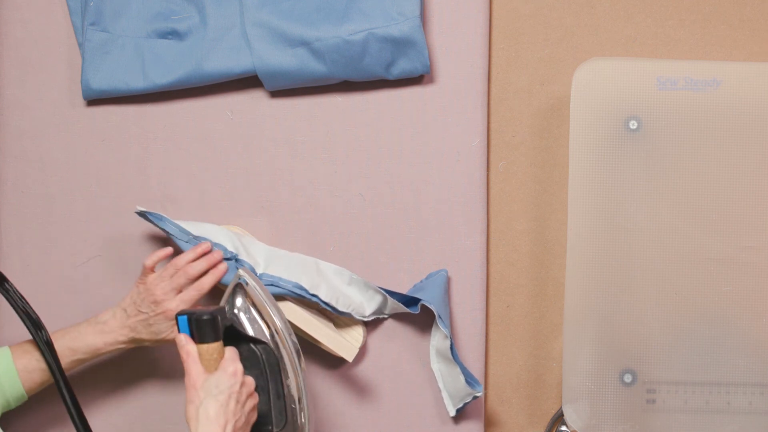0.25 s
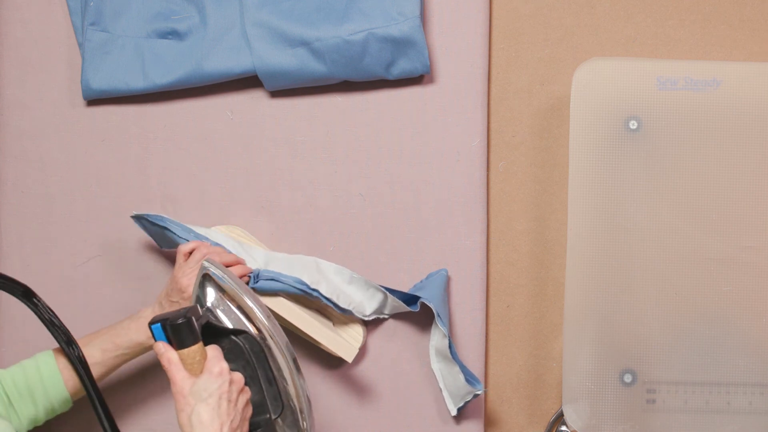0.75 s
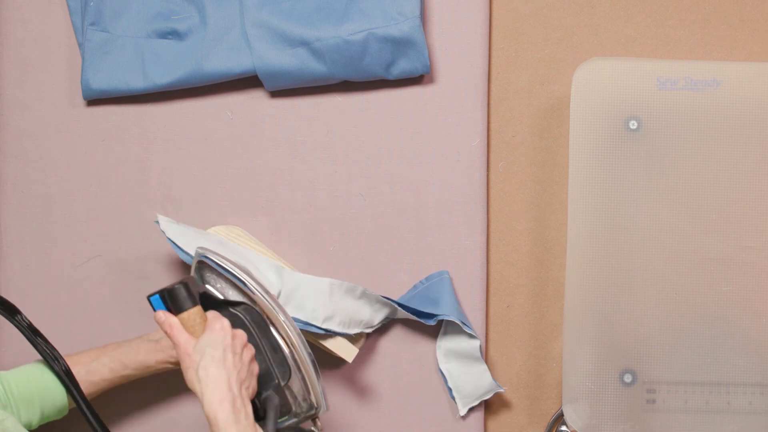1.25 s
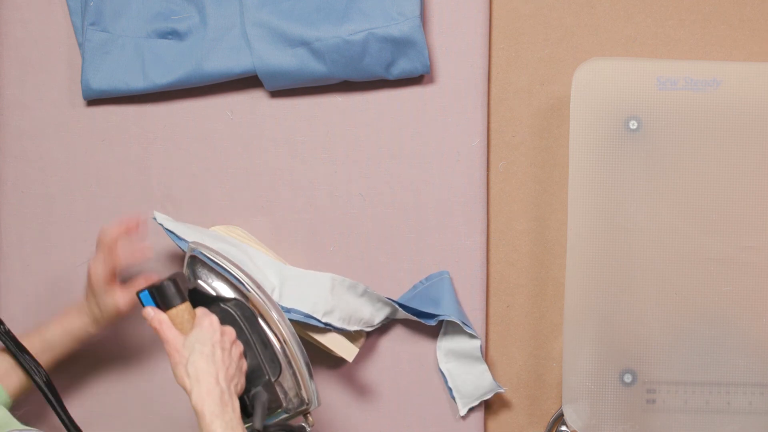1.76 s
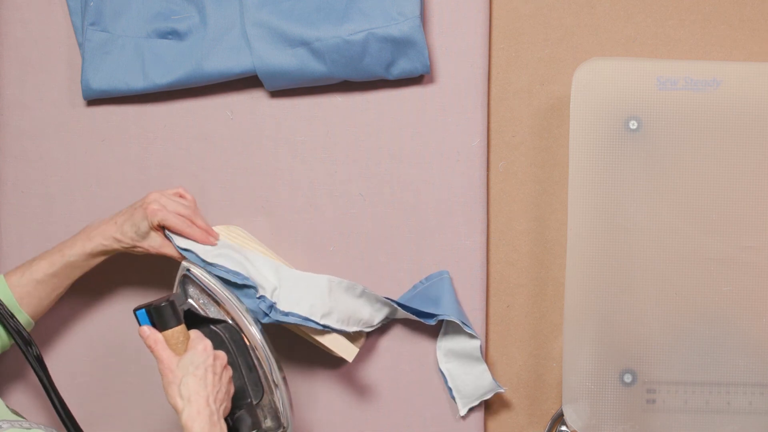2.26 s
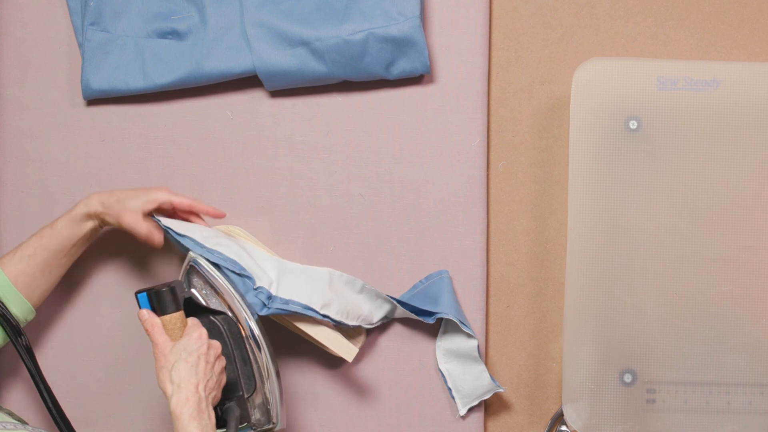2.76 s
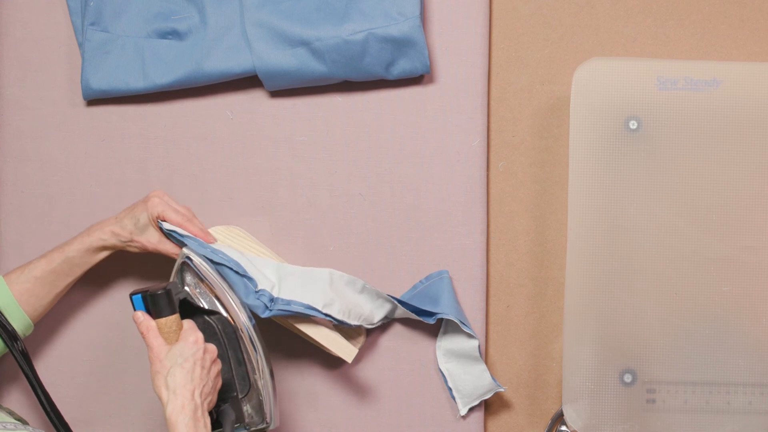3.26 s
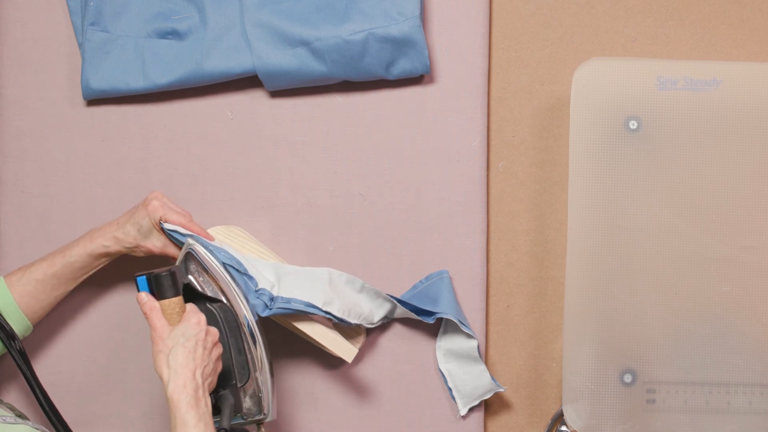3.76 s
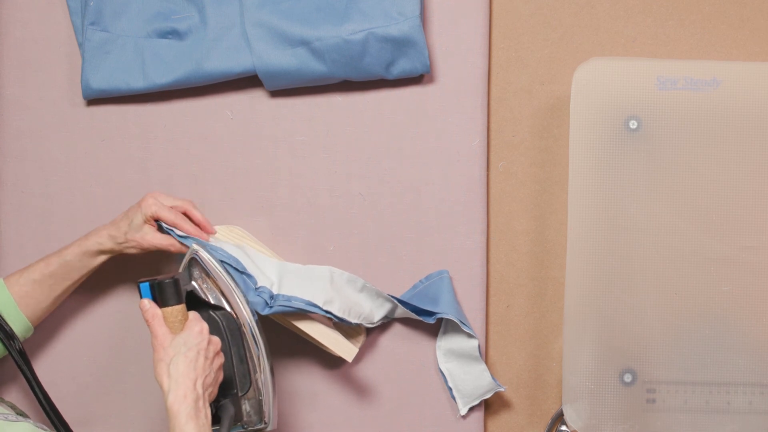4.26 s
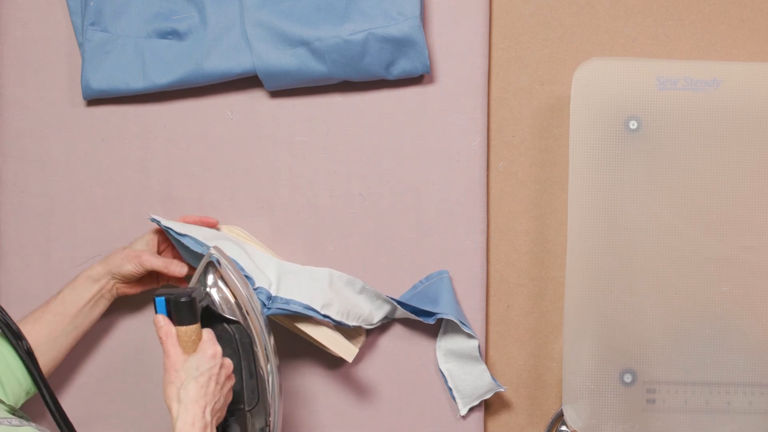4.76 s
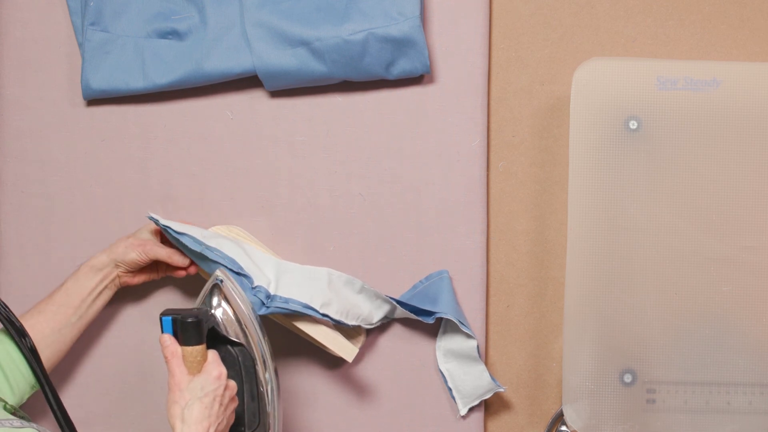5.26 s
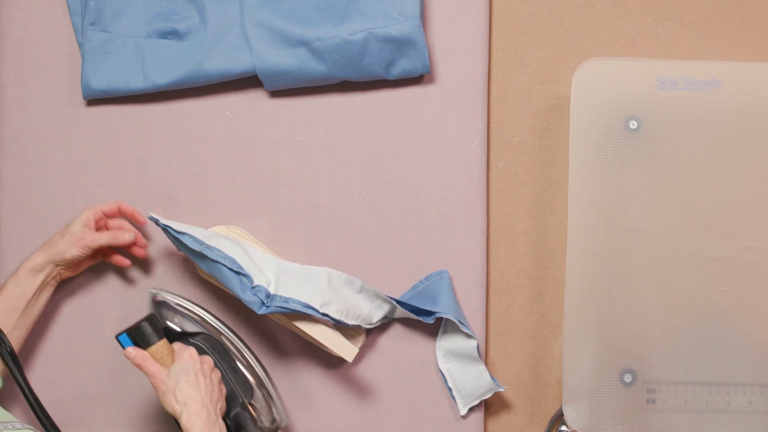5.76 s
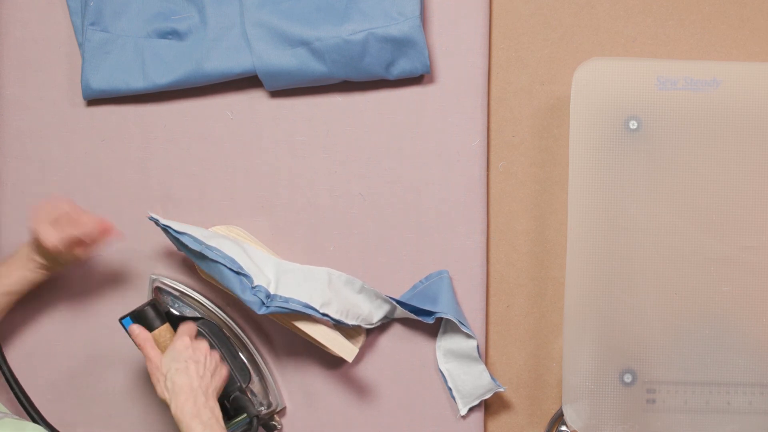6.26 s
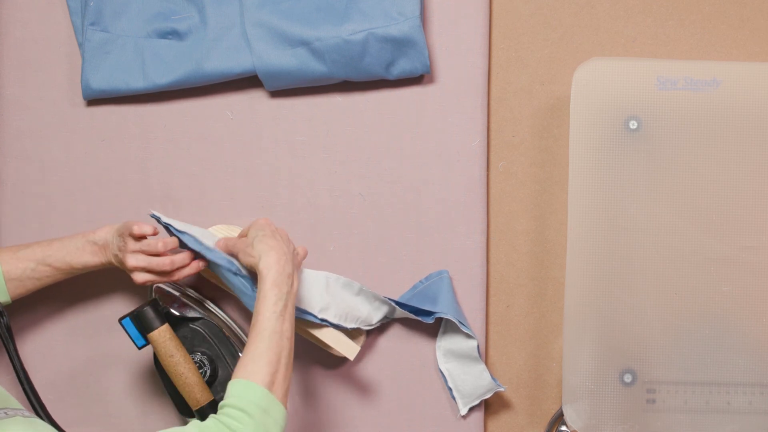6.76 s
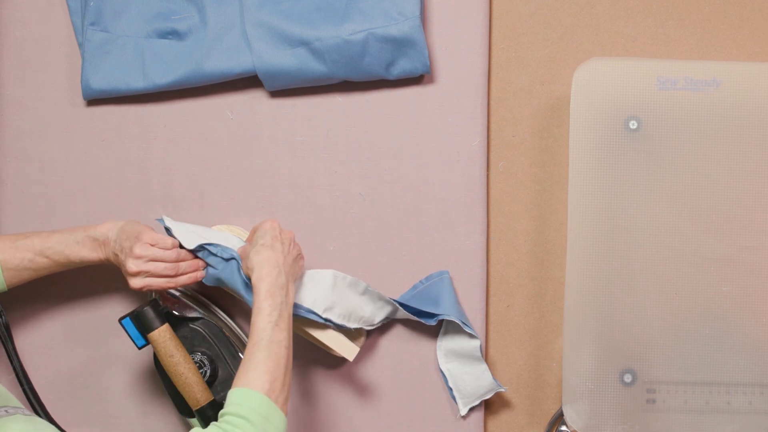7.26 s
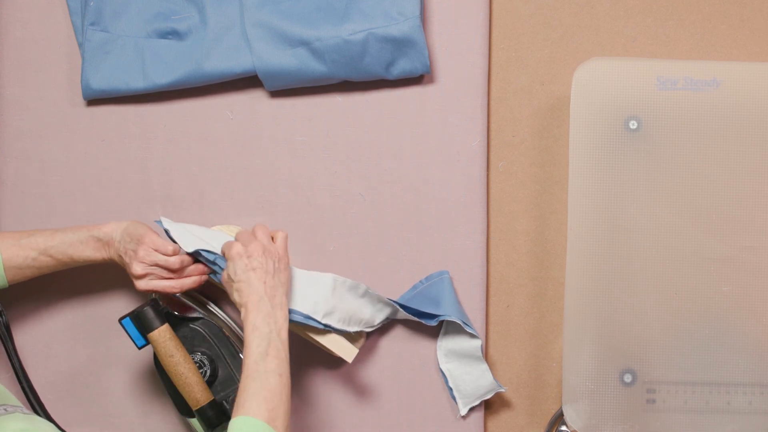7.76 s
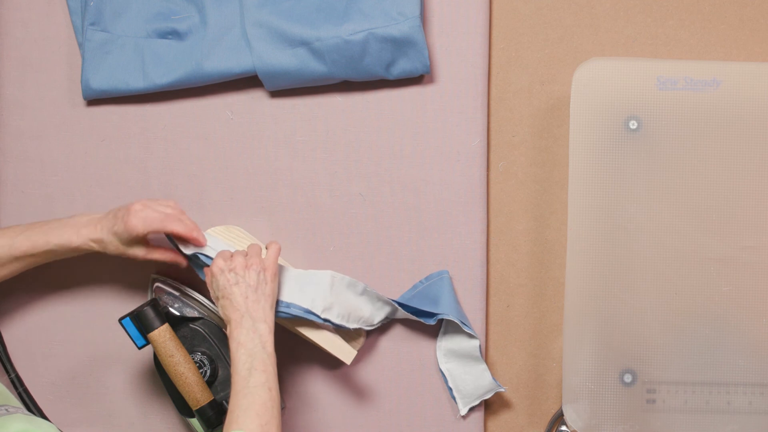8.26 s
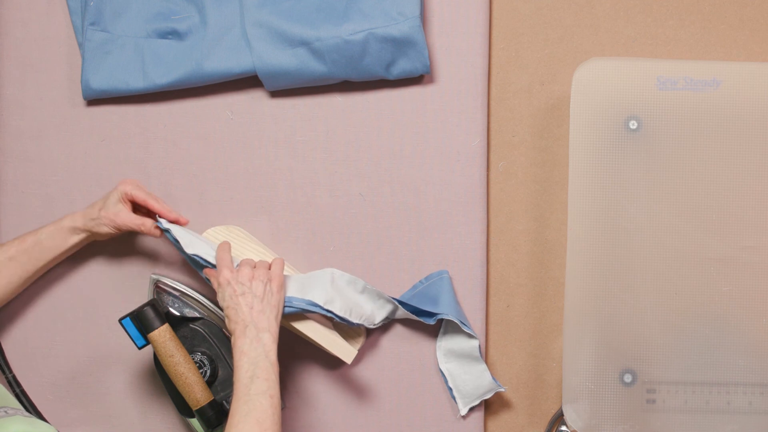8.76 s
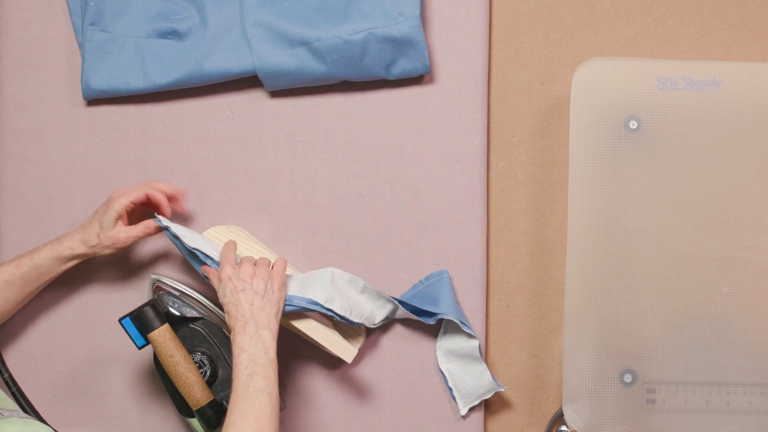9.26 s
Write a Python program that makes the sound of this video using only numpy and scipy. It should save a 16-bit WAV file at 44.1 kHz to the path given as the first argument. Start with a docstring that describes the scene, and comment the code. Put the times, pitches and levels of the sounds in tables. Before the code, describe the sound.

An iron strokes a cotton collar on a wooden form with soft hisses and thin squeaks, then is set down with a rattle over a low hum.

```python
"""An iron presses a shirt collar over a pointed wooden form: strokes hiss as fibres snap free (noise bursts).
Firm pushes excite the form's resonances, thin squeaks sound at single pitches, and stick-slip catches twice.
Loose cloth sweeps, small things tick, and the iron is set down with a rattle of decaying modes.
Behind a short room tail lie machine tones, duct rumble and hiss, and a deep throb about every three seconds."""
import sys
import numpy as np
from scipy import signal
from scipy.fft import rfft, irfft
from scipy.io import wavfile
from scipy.ndimage import uniform_filter1d

SR = 44100
rng = np.random.default_rng(int(sys.argv[2]) if len(sys.argv) > 2 else 0)


def unload_audio(sound):
    """Save the sound as a 16-bit wav file, at the path given as the first command line argument."""
    columns = np.transpose(np.atleast_2d(sound))
    # keep every value between -1 and 1, then stretch to whole-number steps
    steps = np.round(np.clip(columns, -1, 1) * 32767)
    wavfile.write(sys.argv[1], SR, steps.astype(np.int16))


N = 420273
T = np.arange(N) / SR  # s


# firm pushes of the iron that reach the form, before trim:
# start t/s, length/s, low ring level/dB, high ring over low ring/dB
PUSHES = [(0.94, 0.23, -71.5, -1), (1.25, 0.16, -83, 4), (1.48, 0.074, -69, -5), (2.278, 0.19, -74, -1),
          (2.519, 0.21, -70.5, 0), (2.686, 0.27, -74.5, -2), (3.18, 0.17, -72, 0),
          (3.299, 0.12, -66.5, -2.5), (3.49, 0.12, -74, -1), (3.63, 0.1, -69.5, -4.5),
          (3.91, .097, -79.5, 0), (4.3, 0.19, -79, -3), (4.458, .15, -74.5, -6), (4.928, .106, -88, 10),
          (5.065, 0.25, -85, 5.5), (6.857, .215, -71.5, 0), (8.635, 0.1, -70, 0)]
PUSH_ATTACK_S, PUSH_RELEASE_S = 0.031, 0.062


def pressure():
    """Contact force: each push takes hold, keeps its pressure and eases off; pushes add in power."""
    low_power, high_power = np.zeros(N), np.zeros(N)
    for start, length, db, bright_db in PUSHES:
        attack = np.clip((T - start) / PUSH_ATTACK_S, 0, 1)
        release = np.clip((start + length - T) / PUSH_RELEASE_S, 0, 1)
        push = undb(db) * attack * release
        low_power += push ** 2
        high_power += (push * undb(bright_db)) ** 2
    return np.sqrt(low_power), np.sqrt(high_power)


# light strokes of iron and fingers over the cloth, before trim: start t/s, length/s, level/dB
STROKES = [(-0.057, 0.22, -62.5), (0.2, 0.19, -64), (0.342, .226, -61.5), (0.544, .128, -63),
           (0.743, 0.62, -62.5), (0.885, .26, -60.5), (1.377, 0.25, -62), (1.585, 0.62, -72),
           (2.137, 0.15, -69.5), (3.973, 0.41, -73.5), (4.465, 0.16, -65.5), (5.82, .33, -73),
           (6.291, .143, -63.5), (6.72, 0.41, -67), (7.105, .26, -57), (7.393, 0.089, -65),
           (7.58, 0.092, -62.5), (7.672, 0.076, -65.5), (7.731, .115, -64), (7.841, 0.089, -68.5),
           (8.01, 0.12, -62), (8.303, 0.17, -67.5), (8.43, 0.49, -66), (8.65, .155, -66.5),
           (9.062, 0.41, -72.5)]


def sliding(low_push, push_hiss_db=6, resting_db=-83):
    """Power addition: light strokes, hiss in step with the pushes, and a faint stir of resting hands."""
    push_hiss = undb(push_hiss_db) * low_push
    return np.sqrt(arcs(STROKES) ** 2 + push_hiss ** 2 + undb(resting_db) ** 2)


# spectrum of the rubbed cloth: f/Hz, level/dB
CLOTH_SPECTRUM = [(200, -5), (500, -2.5), (900, -4), (2200, -6.5), (3500, -3.5), (6000, -1.5), (8500, -0.5),
                  (11000, -4.5), (13000, -5.5), (15500, -11)]


def rubbing(slide, grip_db=2.0, trim_db=-0.4):
    """Friction noise: cloth hisses with the speed of the stroke, under a grip that is never quite even."""
    hiss = colour(fibres(per_s=5000, spread_db=2.0, smooth=1.24), CLOTH_SPECTRUM)
    return hiss * undb(grip_db * walk(45)) * slide * undb(trim_db)


# resonances of the wooden form, low and high group: f/Hz, width of one filter pass/Hz, level/dB
FORM_LOW_MODES = [(1166, 34, -2), (1495, 48, 2), (2115, 97, -9.5)]
FORM_HIGH_MODES = [(3764, 47, -3), (4706, 120, 5.5), (6570, 180, -17), (8700, 340, -15)]


def form(slide, low_push, high_push, low_db=1.3, high_db=2.0, light_db=-15, steady=0.45, grip_db=2.2):
    """Forced resonance: friction drives the form faintly in any stroke, clearly under pressure."""
    low_drive = np.maximum(undb(light_db) * slide, undb(low_db) * low_push)
    high_drive = undb(high_db) * high_push
    friction = fibres(per_s=2000, spread_db=4.5, smooth=1.0)
    low_ring = low_drive * sustain(resonate(friction, FORM_LOW_MODES), steady)
    high_ring = high_drive * sustain(resonate(friction, FORM_HIGH_MODES), steady)
    return (low_ring + high_ring) * undb(grip_db * walk(40))


# brief catches that make one resonance sing: start t/s, length/s, f/Hz, level/dB before the uneven grip
SQUEAK_TONES = [(-0.02, 0.044, 1170, -57.5), (-0.02, 0.094, 2020, -68), (0.56, 0.11, 3780, -71),
                (1.468, 0.079, 1480, -73), (2.883, 0.026, 4630, -60.5), (4.385, 0.024, 4670, -63),
                (5.657, 0.027, 2490, -67), (6.803, 0.075, 1507, -56), (6.89, 0.076, 2110, -65),
                (7.752, 0.047, 2100, -73), (8.04, 0.064, 2070, -67), (8.485, 0.016, 2000, -61.5),
                (8.638, .08, 1502, -66.5)]


def squeaks(waver=0.01114, grip_db=1.4):
    """Mode locking: friction holds to one resonance, and a thin, unsteady tone swells and stops."""
    out = np.zeros(N)
    turns = np.cumsum(1 + waver * walk(350)) / SR  # wavering cycles of a 1 Hz tone
    grip = undb(grip_db * walk(140))
    for start, length, hz, db in SQUEAK_TONES:
        on = (T > start) & (T < start + length)
        arc = np.sin(np.pi * (T[on] - start) / length)
        out[on] += undb(db) * arc * grip[on] * np.sin(2 * np.pi * hz * turns[on])
    return out


# course of a fingertip juddering over taut cloth: t/s, slip rate before jitter/(1/s), level/dB
JUDDER_COURSE = [(8.484, 263, -74), (8.497, 283, -55.5), (8.53, 185, -62), (8.56, 130, -54),
                 (8.59, 135, -62.5), (8.63, 130, -66), (8.69, 85, -66), (8.79, 54, -77)]
# resonances of the taut cloth: f/Hz, width of one filter pass/Hz, level/dB
TAUT_MODES = [(574, 90, 5), (750, 100, -10), (2000, 170, -12)]


def judder():
    """Stick-slip: a fingertip judders over taut cloth, each slip striking its resonances."""
    return stick_slip(JUDDER_COURSE, TAUT_MODES, jitter=0.17, scatter_db=1.0)


# course of a short dry scrape: t/s, slip rate before jitter/(1/s), level/dB
SCRAPE_COURSE = [(6.811, 700, -70), (6.815, 880, -55), (6.838, 860, -58), (6.852, 740, -65),
                 (6.875, 500, -74)]
# resonances of the scrape: f/Hz, width of one filter pass/Hz, level/dB
SCRAPED_MODES = [(1485, 45, -1), (2400, 450, -0.5), (3750, 550, 5.5), (4270, 350, -10), (8350, 350, -11),
                 (8800, 350, -1)]


def scrape():
    """Stick-slip: faster, more irregular slips fuse into a short dry scrape."""
    return stick_slip(SCRAPE_COURSE, SCRAPED_MODES, jitter=0.4, scatter_db=4)


# spectrum of loose cloth: f/Hz, level/dB
SLEEVE_SPECTRUM = [(300, 6.5), (900, 4), (1600, 1), (2800, -2), (5000, -0.5), (9000, -7)]
# sweeps of the sleeve and the turned collar: start t/s, length/s, level before trim/dB
CLOTH_SWEEPS = [(5.16, 0.28, -73), (5.631, 0.13, -67), (5.735, 0.3, -65.5), (5.997, 0.11, -60.5),
                (6.085, 0.21, -69.5), (7.08, .32, -63.5)]


def loose_cloth(trim_db=0.5):
    """Friction noise: broad sweeps of the sleeve and the turned collar sound darker than the strokes."""
    rustle = colour(fibres(per_s=2500, spread_db=1.0, smooth=0.75), SLEEVE_SPECTRUM)
    return rustle * arcs(CLOTH_SWEEPS) * undb(trim_db)


# the iron bumps and settles:
# t/s, body level/dB, shell level/dB, crackle level before trim/dB, crackle T60/s
IRON_KNOCKS = [(6.063, -45.5, -56, -56, .03), (6.3212, -66, -49.5, -41.5, 0.018),
               (6.3280, -52, -50, -34, 0.012), (6.342, -61, -67, -46, .015), (6.3573, -80, -63, -45, 0.098),
               (6.366, -59, -50, -41, 0.024), (6.3691, -42, -42, -44, 0.013), (6.383, -60, -47, -52, 0.1)]
# modes of the heavy body, then of the shell: f/Hz, level/dB before peak scaling, T60/s
BODY_MODES = [(236, 0.5, 0.065), (336, 3, 0.081), (380, -6, 0.052), (487, -13, 0.021), (660, -9, 0.047)]
SHELL_MODES = [(1130, -4, 0.04), (1268, -7, 0.039), (1314, -4.5, 0.081), (1405, -1, .05), (1507, 1, 0.056),
               (1580, 2, 0.043), (1720, -6.5, 0.1), (2010, -14, 0.085), (2890, -10, 0.065),
               (3280, -9, 0.069), (4320, -11, .05)]
# spectrum of the contact crackle: f/Hz, level/dB
CRACKLE_SPECTRUM = [(500, -11), (1500, -12), (3000, -1.5), (6000, 2), (8500, 6), (12000, -2), (15500, -9)]


def iron(crackle_trim_db=-7):
    """Modal decay: heel and sole touch down; the body thuds, the shell rings, loose parts crackle."""
    out, t = np.zeros(N), T[:16384]
    grit = colour(noise(), CRACKLE_SPECTRUM)
    for start, body_db, shell_db, contact_db, t60 in IRON_KNOCKS:
        body = undb(body_db) * ring(BODY_MODES, t)
        shell = undb(shell_db) * ring(SHELL_MODES, t)
        crackle = np.roll(grit, -int(start * SR))[:len(t)] * decay(t, t60)
        add(out, start, body + shell + undb(contact_db + crackle_trim_db) * crackle)
    return out


# ticks of cloth, nails and handle: t/s, peak level/dB, f/Hz, T60 before filtering/s
TICK_EVENTS = [(0.050, -51, 1180, 0.023), (0.322, -54, 1520, 0.014), (0.348, -59, 1800, .012),
               (0.374, -54, 615, .02), (0.396, -59, 800, .012), (0.415, -55, 650, 0.029),
               (0.4402, -54, 1900, 0.011), (0.441, -49, 740, 0.012), (1.230, -49, 8950, .005),
               (1.5814, -38.5, 4200, 0.0067), (1.8587, -34.5, 7300, 0.011), (1.8588, -40, 2600, 0.012),
               (5.905, -44, 7000, .004), (5.973, -45, 6000, 0.011), (6.033, -54, 1400, .015),
               (6.0635, -44, 2500, 0.023), (6.7269, -43, 1480, 0.0071), (7.250, -43, 6000, .006),
               (7.630, -50, 7000, .012), (7.695, -56, 7000, .006), (9.391, -43, 7200, .004)]


def ticks():
    """Impulse response: tiny snaps, each a burst around its own pitch that dies at once."""
    out, t = np.zeros(N), T[:4096]
    for start, db, hz, t60 in TICK_EVENTS:
        burst = rng.standard_normal(len(t)) * decay(t, t60)
        burst[0] += 6  # the first contact is stressed
        snap = band(band(burst, hz, hz), hz, hz)  # filters as wide as the pitch is high
        add(out, start, undb(db) * snap / np.abs(snap).max())
    return out


def room(x, t60_s=0.18, tail_db=-13.5, gap_s=0.0034):
    """Reverberation: after a short gap, table and walls return a short, soft, diffuse tail."""
    t = T[:16384]
    tail = rng.standard_normal(len(t)) * decay(t, t60_s) * (t > gap_s)
    return x + undb(tail_db) * signal.fftconvolve(x, tail / np.linalg.norm(tail))[:N]


# lobes of one throb, a dip of pressure, a swell and a weaker dip:
# delay/s, half-width at 1/e height/s, height/full scale
PRESSURE_LOBES = [(.022, 0.016, -.012), (.083, 0.024, 0.015), (.17, 0.041, -0.0037)]


def throb(first_s=0.1326, period_s=3.065):
    """Infrasonic pulse: a slow pressure wave at the bottom edge of hearing returns at a steady pace."""
    out = np.zeros(N)
    for start in np.arange(first_s, T[-1], period_s):
        for delay, width, height in PRESSURE_LOBES:
            out += height * np.exp(-((T - start - delay) / width) ** 2)
    return out


# fan, motor and mains tones: f/Hz, rms level/dB, frequency wander/share of f
MACHINE_TONES = [(86.6, -50, 0.0024), (119.9, -65.5, 0.0017), (117.9, -67.5, 0.0079), (176.3, -71, .012),
                 (233.1, -68.5, .004), (294.7, -73.5, .008), (352.4, -80, 0.0125), (433, -86, .002)]


def machine_tones():
    """Frequency modulation: each steady machine tone wanders slightly around its pitch."""
    out = np.zeros(N)
    for hz, db, wander in MACHINE_TONES:
        turns = rng.random() + hz * np.cumsum(1 + wander * walk(9)) / SR
        out += undb(db) * np.sqrt(2) * np.sin(2 * np.pi * turns)
    return out


# spectra of the duct rumble and of the smooth air hiss: f/Hz, level/dB
RUMBLE_SPECTRUM = [(20, 3), (45, 1), (90, -3.5), (140, 4.5), (200, 0.5), (260, -1.5), (330, -7.5),
                   (420, -16.5), (700, -49)]
AIR_SPECTRUM = [(240, -35.5), (400, -5), (432, -2), (605, -8), (694, -7.5), (1340, -13), (1490, -13),
                (1660, -13.5), (4700, -19.5), (5650, -18), (15500, -20.5)]


def ventilation(rumble_db=-60.5, flicker_db=1.54, air_db=-68.5):
    """Broadband flow noise: duct rumble with a flickering level, under a steady hiss."""
    rumble = undb(rumble_db + flicker_db * walk(6)) * colour(noise(), RUMBLE_SPECTRUM)
    return rumble + undb(air_db) * colour(noise(), AIR_SPECTRUM)


def arcs(strokes, speed_power=0.51):
    """Speed law: each stroke's speed is half a sine, its gain a power of speed; overlaps add in power."""
    power = np.zeros(N)
    for start, length, db in strokes:
        speed = np.sin(np.pi * np.clip((T - start) / length, 0, 1)).clip(0)
        power += (undb(db) * speed ** speed_power) ** 2
    return np.sqrt(power)


def fibres(per_s, spread_db, smooth):
    """Shot noise: countless fibres snap free, a few much harder than the rest, over a smooth hiss."""
    happens = rng.random(N) < per_s / SR
    strength = undb(spread_db * np.minimum(rng.exponential(size=N), 5))
    return unit(happens * noise() * strength) + smooth * noise()


def stick_slip(course, modes, jitter, scatter_db, steady=0.96):
    """Stick-slip: a surface lets go at uneven intervals, and each slip strikes the resonances."""
    times, rates, db = np.transpose(course)
    rate = np.interp(T, times, rates)
    phase = np.cumsum(rate * np.exp(jitter * walk(250))) / SR
    slips = np.diff(np.floor(phase), prepend=0)  # one impulse per whole turn
    slips = slips * undb(scatter_db * noise()) / np.sqrt(rate)
    return sustain(resonate(slips, modes), steady) * swell(times, db)


def sustain(x, share, hold_s=0.016):
    """Self-limiting: friction feeds a weak vibration and brakes a strong one, which evens out its swells."""
    power = np.abs(uniform_filter1d(x ** 2, int(hold_s * SR))) + 1e-9
    return unit(x / power ** (np.clip(share, 0, 1) / 2))


def band(x, hz, width):
    """Single resonance: a second-order peak filter with gain 1 at its centre."""
    return signal.lfilter(*signal.iirpeak(hz, hz / width, fs=SR), x)


def resonate(x, modes, skirt=5):
    """Parallel resonances: each mode is filtered narrow, then wide, for steep skirts; rms 1."""
    out = np.zeros(N)
    for hz, width, db in modes:
        out += undb(db) * unit(band(band(x, hz, width), hz, skirt * width))
    return unit(out)


def ring(modes, t):
    """Modal superposition, peak 1: each blow lands on another spot, so the modes start either way."""
    out = np.zeros(len(t))
    for hz, db, t60 in modes:
        out += rng.choice([-1, 1]) * undb(db) * decay(t, t60) * np.sin(2 * np.pi * hz * t)
    return out / np.abs(out).max()


def decay(t, t60):
    """Exponential damping: a fall of 60 dB in t60 seconds."""
    return np.exp(-np.log(1000) * t / t60)


def colour(x, points):
    """Spectral shaping: weight x by (f/Hz, level/dB) points joined over log frequency, at rms 1."""
    hz, db = np.transpose(points)
    f = np.arange(N // 2 + 1) * SR / N
    gain = undb(np.interp(np.log(f + 1), np.log(hz), db))
    return unit(irfft(rfft(x) * gain, N))


def walk(rate):
    """Random modulation: chance values, rate per second, joined by straight lines, at rms 1."""
    count = int(10 * rate) + 2
    return unit(np.interp(T * rate, np.arange(count), rng.standard_normal(count)))


def swell(times, db):
    """Envelope: gain along a level curve, practically silent outside it."""
    return undb(np.interp(T, times, db, left=-150, right=-150))


def noise():
    """White noise: equal power at all frequencies."""
    return rng.standard_normal(N)


def undb(db):
    """Level law: decibels to amplitude gain."""
    return 10 ** (np.asarray(db) / 20)


def unit(x):
    """Normalisation: scale to rms 1."""
    return x / np.sqrt(np.mean(x ** 2))


def add(out, start, sound):
    """Superposition: mix a sound in at start seconds."""
    i = int(start * SR)
    out[i:i + len(sound)] += sound[:N - i]


def scene():
    """Superposition: handwork at the table excites the room; the background is added without its tail."""
    low_push, high_push = pressure()
    slide = sliding(low_push)
    ironing = rubbing(slide) + form(slide, low_push, high_push) + squeaks()
    catches = judder() + scrape()
    handwork = ironing + catches + loose_cloth() + iron() + ticks()
    background = throb() + machine_tones() + ventilation()
    return (room(handwork) + background)[None]


def record(dry, top_hz=15750):
    """Low-pass filtering: a steep elliptic filter cuts the treble above top_hz."""
    low_pass = signal.ellip(10, 0.1, 70, top_hz, fs=SR, output="sos")  # 0.1 dB ripple, 70 dB stop band
    return signal.sosfilt(low_pass, dry)


dry = scene()
out = record(dry)
unload_audio(out)
```